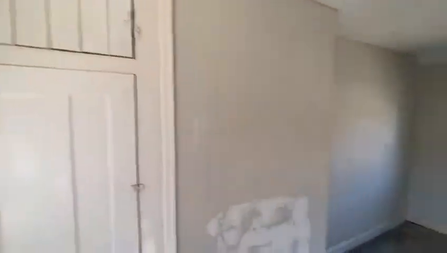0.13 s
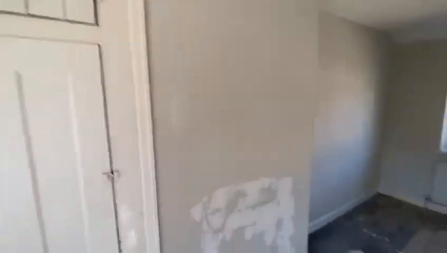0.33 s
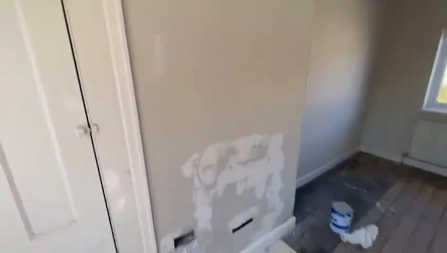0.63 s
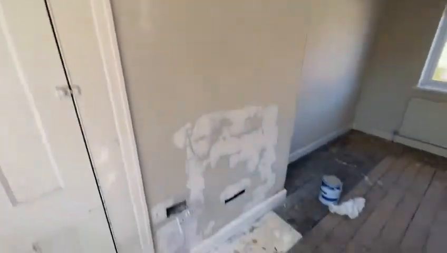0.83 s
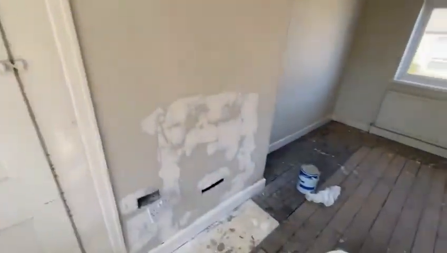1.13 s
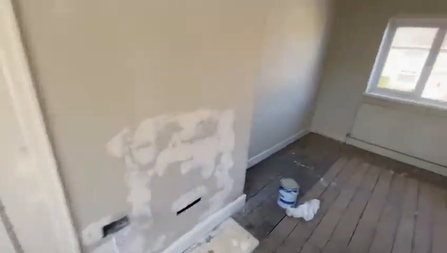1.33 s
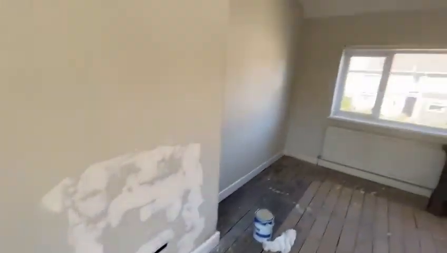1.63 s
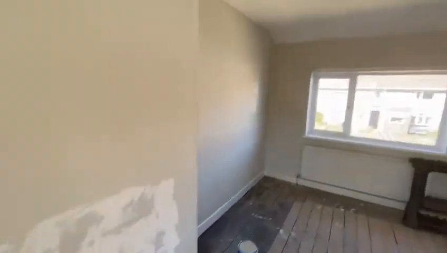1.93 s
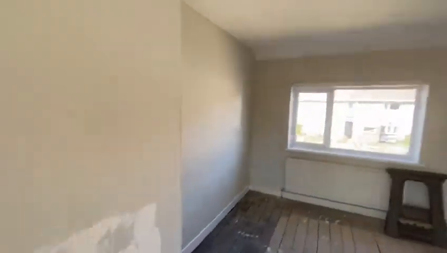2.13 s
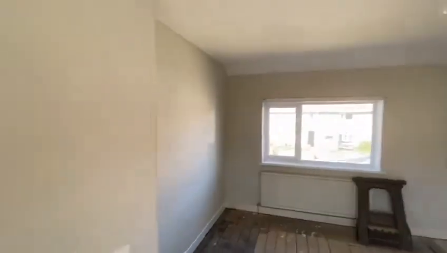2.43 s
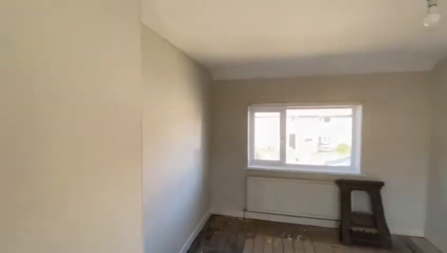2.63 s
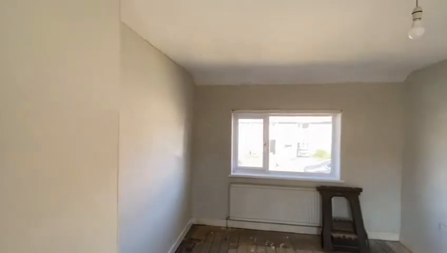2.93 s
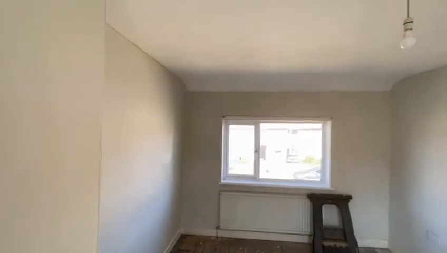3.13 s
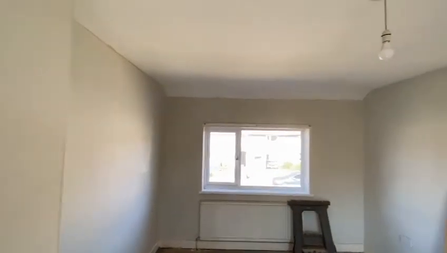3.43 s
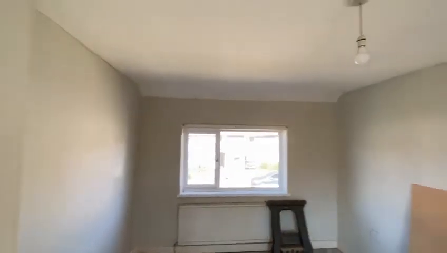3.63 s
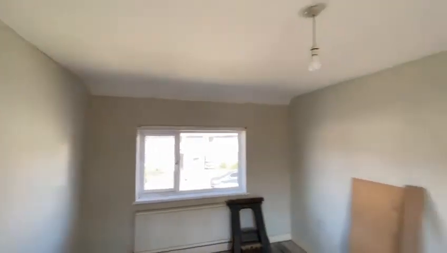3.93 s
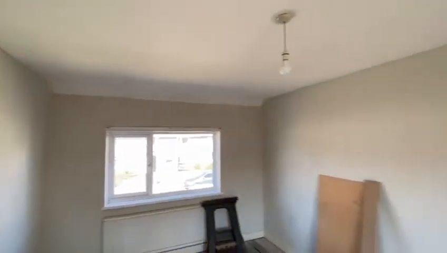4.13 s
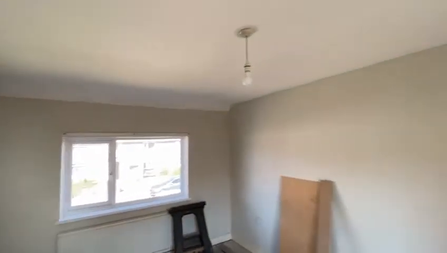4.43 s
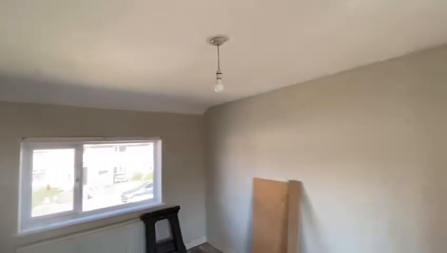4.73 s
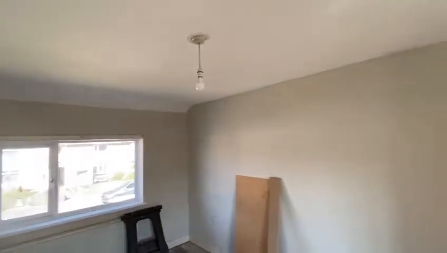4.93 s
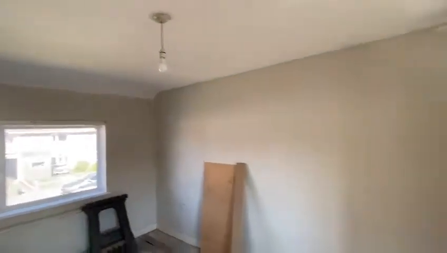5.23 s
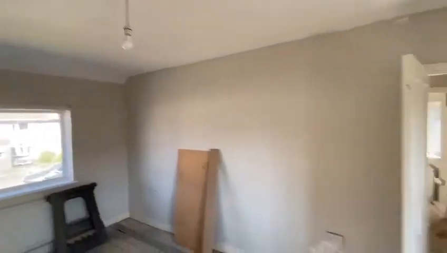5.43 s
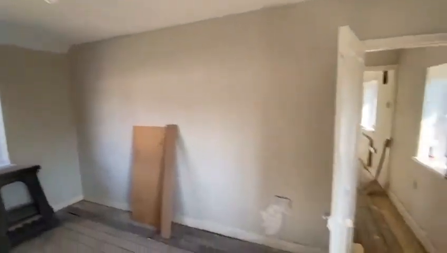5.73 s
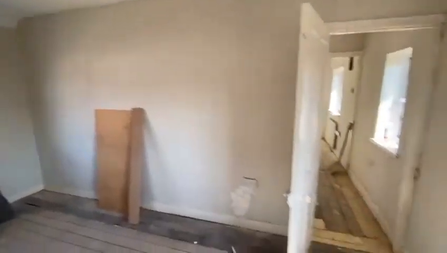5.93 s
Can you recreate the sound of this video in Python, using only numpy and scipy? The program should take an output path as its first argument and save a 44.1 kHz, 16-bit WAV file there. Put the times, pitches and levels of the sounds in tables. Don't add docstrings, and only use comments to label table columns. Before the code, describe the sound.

In a bare, reverberant room, a heavy heel thuds on wooden boards, then soles scuff and tick on grit. Quiet shuffling follows until a hollow plank is knocked just after three seconds. Quick steps crunch and a kicked wooden offcut clatters and bounces around four seconds. Then it fades to quiet air, a faint board groan, a tiny bird call and one soft last step. Small handheld stereo recorder, slightly dull and thinned treble.

```python
import sys
import numpy as np
from scipy import signal
from scipy.fft import rfft, irfft
from scipy.io import wavfile
from scipy.ndimage import uniform_filter1d

SR = 44100
rng = np.random.default_rng(int(sys.argv[2]) if len(sys.argv) > 2 else 0)


def to_linear_factor(level_db):
    exponent = np.asarray(level_db, float) / 20
    return 10 ** exponent


def transcribe(u):
    v = np.clip(np.atleast_2d(u).T, -1, 1)
    q = np.round(v * 32767).astype(np.int16)
    wavfile.write(sys.argv[1], SR, q)


N = 267951

# start_s [s], level_db [dB], treble_db [dB], left_right_db [dB]
GRIT_TICKS = [(0.003, -32, 5.5, -0.5), (0.122, -39, -31, 11), (0.184, -39, -32, -9), (0.466, -45.5, 13, 22),
              (0.636, -34.5, -5, 11), (0.659, -37, -5, -4), (0.86, -31, -11, 4), (1.596, -42, -17, -1),
              (1.795, -56, -30, 1), (2.067, -49.5, -4, 19), (2.163, -42, -10, 5), (2.515, -40, -7.5, 6),
              (2.926, -40.5, -13, 10), (3.223, -30.5, -18.5, 2.5), (3.374, -40, -16, 8),
              (3.589, -35.5, -37, 17), (3.614, -27.5, -13.5, 12), (3.644, -31, -43, -14.5),
              (3.712, -22.5, -7, 7), (3.736, -26.5, -17.5, -4), (3.862, -31.5, -2, 11.5),
              (3.964, -18.5, -12.5, -6.5), (3.994, -13.5, -5.5, 2), (4.03, -23, -40, -10),
              (4.1, -23.5, -10, 8.5), (4.323, -25.5, -2.5, 9.5), (4.624, -39.5, -31, -1),
              (5.861, -58, -19, 1), (5.909, -43.5, -14.5, 1.5), (5.947, -52, -11, 13)]
# start_s [s], level_db [dB], pitch_hz [Hz], left_right_db [dB]
CHIP_SNAPS = [(0.12, -37.5, 950, 2), (0.222, -42, 2050, 8), (0.095, -46, 674, 5), (0.15, -34.5, 440, -1),
              (0.16, -41, 660, -3), (2.164, -44, 865, 3), (2.925, -53, 1100, -8), (2.926, -53, 2400, 0),
              (2.945, -46, 705, -1), (3.223, -37, 2500, 3), (3.236, -38.5, 1550, -3), (3.77, -35, 1420, 2),
              (3.81, -46, 1330, 0), (3.714, -20.5, 7770, 3), (3.738, -25.5, 1310, 0),
              (3.966, -32, 1800, -2), (3.995, -30, 3770, 4), (3.996, -20, 5140, 10),
              (3.999, -32, 3160, -13), (4.323, -31, 1680, -1), (4.329, -23.5, 3800, -2),
              (4.328, -50, 5500, 0), (4.351, -28, 3168, 6.5)]
# start_s [s], level_db [dB], pitch_hz [Hz]
SOLE_KNOCKS = [(0.008, -31.5, 290), (0.11, -39, 332), (0.182, -39, 394), (0.243, -57, 437),
               (0.642, -42, 251), (0.667, -38.5, 236.6), (0.866, -57, 233), (1.349, -57.5, 220),
               (1.6, -55, 251), (0.801, -49, 226), (2.058, -52, 478), (2.082, -41, 327), (2.14, -49, 403),
               (2.169, -52, 397), (2.208, -55, 480), (2.945, -51.5, 307), (2.974, -44.5, 378),
               (3.668, -39, 242), (3.704, -35, 210), (3.343, -43, 376), (3.612, -38, 563), (3.64, -32, 360),
               (3.712, -30, 344.6), (3.745, -36.5, 373), (3.969, -49, 243), (3.998, -37, 300),
               (4.034, -36, 407), (4.105, -50, 366), (5.865, -60, 310), (5.885, -56, 262)]
# pitch_ratio [1], level_db [dB], t60_s [s]
BOARD_OVERTONES = [(.8, -2, 0.028), (1.004, 3.5, 0.1), (1.127, 0, 0.058), (1.22, 10, 0.016),
                   (1.6, -26, 0.062), (1.95, -6, 0.07), (2.401, -34, 0.2), (2.75, -32, 0.14)]
# start_s [s], length_s [s], friction_db [dB], fade_db [dB], board_pressure_db [dB]
SCUFFS = [(0.0, 0.13, -48.5, 3, 8), (0.628, 0.1, -34, -13, 1), (2.061, 0.31, -61, -6.5, 13.5),
          (2.924, 0.12, -57.5, -8, 15.5), (3.227, 0.17, -55, -17.5, 26), (3.582, 0.07, -41.5, 6.5, 5.5),
          (3.961, 0.13, -29, -11, 0.5), (4.093, 0.22, -39.5, -11.5, -20),
          (4.323, 0.12, -35.5, -18.5, -12.5), (4.616, 0.16, -60, -16, 8.5), (5.857, 0.12, -52, -28, 8.5)]
# start_s [s], length_s [s], friction_db [dB], board_pressure_db [dB]
SLIDES = [(0.069, 0.2, -51.5, 13), (0.4, 0.22, -49, -1), (0.684, 0.17, -39.5, -9.5), (0.799, 0.084, -44, 3),
          (1.377, 0.2, -57, 0.5), (1.543, 0.16, -54, 3.5), (1.68, 0.22, -59.5, 2.5),
          (2.301, 0.22, -53.5, -1), (2.449, 0.15, -68, 19.5), (3.059, 0.2, -53, -1), (3.6, 0.12, -38.5, 0),
          (3.69, 0.14, -39.5, 3.5), (3.799, 0.14, -40, -12), (4.181, 0.18, -50, -9),
          (4.421, 0.19, -66.5, -2), (5.171, 0.18, -66, 1), (5.348, 0.2, -61.5, -15),
          (5.415, 0.12, -69.5, 8)]
# freq_hz [Hz], density_db [dB per Hz]
GRIT_HISS = [(530, -28.5), (900, -0.5), (1370, -4.5), (1500, -4), (2010, -2.5), (2750, -3.5), (5210, -8),
             (8760, -13), (9350, -31.5), (11100, -11.5), (12000, -53.5), (15600, -29.5), (22000, -120)]
# pitch_hz [Hz], width_hz [Hz], level_db [dB]
BOARD_BODY = [(262.5, 42, 9.5), (342, 82, 6.5), (410, 180, 1), (557, 50, 2), (637, 96, -2.5),
              (720, 140, -15), (1035, 51, -29)]
# start_s [s], level_db [dB], pitch_hz [Hz], t60_s [s]
THUDS = [(0.0095, -17, 71.5, 0.15), (0.012, -35.5, 201.4, 0.17), (0.031, -33, 45.3, 0.55),
         (0.058, -36, 72, 0.25), (0.06, -35, 260, 0.13), (1.02, -53.5, 215, 0.47),
         (3.16, -50, 45, 0.35), (3.645, -34, 360, 0.064), (0.641, -47, 378, .15),
         (1.598, -62, 419, .1), (2.93, -53, 555, 0.088), (3.735, -28.5, 135, 0.15),
         (5.469, -56.5, 291, 0.25), (5.53, -61.5, 210.5, 0.32), (5.869, -56, 190, .2),
         (1.601, -50, 61.4, 0.24), (2.152, -40, 40.7, 0.27), (2.178, -42, 43.7, 0.22),
         (2.225, -44, 41.3, 0.4), (2.14, -51, 152, 0.16), (2.2, -48, 236, 0.18),
         (2.293, -55, 43.2, 0.17), (2.973, -42.5, 59.7, 0.62), (3.243, -44.5, 93, 0.27),
         (3.665, -32.5, 85.5, 0.13), (3.724, -24.5, 64.4, 0.2), (3.77, -34.5, 287.4, 0.24),
         (3.997, -34, 116, 0.31), (4.668, -58, 120, 0.14), (5.88, -55, 68.5, 0.29),
         (6.008, -71, 50.6, 0.3)]
# start_s [s], length_s [s], pitch_hz [Hz], level_db [dB]
SQUEAKS = [
    (2.45, .14, 11400, -72),
    (2.77, .07, 11400, -66),
    (3.33, .12, 11300, -71),
    (3.34, .12, 7000, -66),
]
# start_s [s], level_db [dB]
OFFCUT_BOUNCES = [
    (3.74, -49),
    (3.966, -27.5),
    (3.996, -20.5),
    (4.02, -43),
    (4.045, -49),
    (4.101, -28),
    (4.15, -42),
    (4.324, -42),
]
# pitch_hz [Hz], level_db [dB], t60_s [s]
OFFCUT_MODES = [(520, -2, 0.048), (636, -1.5, 0.047), (740, -5.5, 0.055), (1272, -5.5, 0.05),
                (1377, 4.5, 0.024), (1739, 1, 0.026), (2010, 4, 0.024), (2300, -3, 0.014)]
# start_s [s], level_db [dB], pitch_hz [Hz], left_right_db [dB]
RATTLES = [(3.965, -29.5, 644, 10), (3.995, -29, 292, 1), (3.996, -27.5, 760, -4), (4.010, -28, 471, 1),
           (4.018, -27, 638, 4), (4.031, -28.5, 336, -5), (4.012, -23, 1410, 3), (4.016, -34, 2100, 2),
           (4.038, -25.5, 1280, -2), (4.053, -28, 756, -6), (4.093, -25, 1660, -4), (4.103, -31, 362, -2),
           (4.155, -33, 806, 4), (4.175, -39, 760, 7), (4.213, -40, 557, 0), (4.236, -42, 520, -6),
           (4.279, -43, 517, 4), (4.622, -44, 1230, -3), (4.624, -54, 746, 3), (4.634, -54, 360.5, 0),
           (0.853, -40, 955, -2), (0.862, -42, 560, 3), (0.77, -35, 1580, 0), (1.594, -55, 1200, 2),
           (1.616, -51, 840, 0), (1.475, -62, 2100, 0), (1.8, -55, 600, 0), (1.638, -49, 700, 0),
           (1.655, -48.5, 830, -2), (2.064, -44, 560, 5), (2.172, -42, 410, -4), (2.205, -42.5, 445, -3),
           (2.928, -54, 1300, 0), (2.93, -46, 1890, -3), (2.947, -47, 520, 2), (2.956, -42, 407, 2),
           (2.964, -41, 1790, -4), (3.265, -29, 844, 6), (3.29, -29.5, 805, 4), (3.318, -36, 827, 2),
           (3.336, -37, 845, 3), (3.377, -34.5, 363, -4), (3.226, -41, 1550, 4), (3.278, -43, 1620, 0),
           (3.295, -35, 1700, -3), (3.968, -26, 1860, 0), (3.735, -38, 1340, 4), (0.64, -46, 4100, 0),
           (0.7, -48, 5200, 0), (0.79, -39, 3560, 0)]
# pitch_hz [Hz], level_db [dB], t60_s [s]
PLANK_MODES = [(135, -15.5, 0.104), (327, -0.5, 0.18), (374, -3.5, 0.15), (397, -9, 0.33),
               (529, -10.5, 0.096), (667, -28, 0.078), (756, -21.5, 0.48), (800, -21, 0.77),
               (818, -17.5, 0.48), (928, -20, 0.6), (1600, -16, 0.23)]
# start_s [s], level_db [dB]
PLANK_BLOW = (3.2305, -15.5)
# pitch_hz [Hz], level_db [dB], t60_s [s]
JOIST_MODES = [(38.8, -8.5, 0.94), (58.6, 4.5, 0.31), (73, -5, 0.03), (101, -5, 0.21), (138.5, -19, 0.55)]
# start_s [s], level_db [dB], letting_go_t60_s [s]
LOADS = [(0.028, -24.5, 0.59), (0.48, -47, 1.7), (0.74, -54, 0.47), (0.859, -50.5, 1.3), (1.39, -60, .3),
         (1.63, -51, 0.23), (1.83, -66, 0.47), (2.15, -41.5, 0.9), (2.4, -52, 1.3), (2.55, -52, 0.1),
         (2.66, -52.5, 0.82), (2.989, -37, 0.24), (3.11, -50, 2.2), (3.38, -50, 0.17), (3.63, -35.5, 1.14),
         (3.76, -30, 0.34), (3.858, -56, 0.19), (4.05, -42.5, 0.65), (4.18, -44, 0.13), (4.47, -48, 0.15),
         (4.77, -60.5, 2.7), (5.03, -65, 2.2), (5.3, -64, 0.15), (5.52, -47.5, 0.4), (5.9, -48, 0.65),
         (6.04, -58, 0.17)]
# time_s [s], pitch_hz [Hz], level_db [dB]
GROAN = [
    (5.46, 89, -73),
    (5.51, 96.2, -60),
    (5.55, 100.5, -53),
    (5.6, 98.5, -54),
    (5.63, 101, -87),
]
# time_s [s], pitch_hz [Hz], level_db [dB]
BIRD = [
    (5.47, 6980, -86),
    (5.502, 7550, -79),
    (5.61, 7100, -81),
    (5.652, 7820, -83),
    (5.706, 7660, -85),
    (5.744, 7100, -99),
    (5.772, 7260, -85),
    (5.808, 8000, -79),
    (5.86, 7200, -83),
]
# start_s [s], length_s [s], pitch_hz [Hz], level_db [dB]
OUTDOOR_WHINES = [
    (0.849, 0.67, 2050, -65.5),
    (4.699, 0.6, 2044, -76),
    (4.877, 0.15, 1150, -68),
    (5.02, .14, 1160, -75),
    (5.142, 0.095, 1140, -70),
]
# freq_hz [Hz], t60_s [s]
ROOM_DECAY = [(60, 0.74), (130, 0.46), (230, 0.62), (420, 0.98), (1100, 1), (2900, 1), (7700, 0.69)]
# freq_hz [Hz], density_db [dB per Hz]
AIR_SPECTRUM = [(18, -52), (30, -3.5), (108, -4), (132, -5.5), (317, -13), (461, -10), (1050, -9.5),
                (1140, -8), (1260, -11), (2350, -13.5), (3180, -17.5), (7640, -20.5), (12000, -28),
                (15600, -83), (22000, -120)]
# time_s [s], level_db [dB]
AIR_DRIFT = [(0.0, -58), (1.1, -61.5), (3.5, -58.5), (4.3, -59), (4.8, -72.5), (5.8, -70.5), (6.07, -64)]
# freq_hz [Hz], likeness [0-1]
LIKENESS = [(45, .995), (80, .97), (140, .6), (300, .62), (600, .15), (4000, .1), (8500, .45), (11000, .6)]
# freq_hz [Hz], gain_db [dB]
MIC = [(18, -52.5), (30, -5), (45, -3.5), (2300, -2), (2500, -3.5), (2750, -3.5), (7500, -4), (8800, -3),
       (9350, -4.5), (9800, -5.5), (11650, -8.5), (11950, -57)]
# freq_hz [Hz], threshold [spreads]
HOLES = [(700, -30), (900, -3.2), (1700, -2.4), (2200, -2), (2500, -1.5), (3000, -1.6), (7300, -1.45),
         (7900, -.6), (8900, -.3), (9300, -.35), (9700, -.5), (9900, -1.4), (11500, -1.3)]
# freq_hz [Hz], threshold_db [dB]
GIVING_UP = [(1000, -40), (1500, -10), (7000, -10), (7800, -7), (8600, -4.5), (9100, 1.5), (9600, 2),
             (9700, -8), (11300, -10), (11750, -2)]
# freq_hz [Hz], share [1]
THINNING = [(7000, 0.67), (7800, 0.91), (9400, 0.91), (9800, .6)]
# freq_hz [Hz], side_gain_db [dB]
SIDE = [(40, -10), (70, -7.5), (120, 2), (250, 1), (6000, 0), (8500, 3), (9800, -3), (11500, -16)]

BITE_S, SWELL_DB = 0.011, -13
SOLE_HZ, SOLE_HZ_PER_DB = 1590, -19
LOADING_DB_PER_S, REST_DB = 240, -71.5
SNAP_CYCLES, SNAP_RISE_S = 18.8, 0.00016
RATTLE_CYCLES, RATTLE_RISE_S = 25.6, 0.0014


def read(points, hz):
    f, value = np.transpose(points)
    return np.interp(np.log(hz + 1), np.log(f + 1), value)


def evened(x):
    return x / np.sqrt(np.mean(x ** 2) + 1e-20)


def add(mix, start_s, sound):
    part = mix[:, max(round(start_s * SR), 0):][:, :sound.shape[1]]
    part += sound[:, :part.shape[1]]


def panned(x, left_right_db):
    return x * to_linear_factor(np.array([left_right_db / 2, -left_right_db / 2])).reshape(2, -1)


def coloured(x, points):
    hz = abs(np.fft.fftfreq(4096, 1 / SR))
    log_gain = np.log(to_linear_factor(read(points, hz)))
    phase = -signal.hilbert(log_gain).imag
    taps = np.fft.ifft(np.exp(log_gain + 1j * phase)).real[:2048]
    taps = taps.reshape((1,) * (x.ndim - 1) + (-1,))
    return signal.oaconvolve(x, taps, axes=-1)[..., :x.shape[-1]]


def resonate(x, hz, width_hz):
    turn = np.exp(2j * np.pi * np.cumsum(hz * np.ones(x.shape[-1])) / SR)
    r = np.exp(-np.pi * width_hz / SR)
    return 2 * (turn * signal.lfilter([1 - r], [1, -r], x / turn)).real


def noise_pair(size):
    a, b = rfft(rng.standard_normal((2, size)))
    hz = np.fft.rfftfreq(size, 1 / SR)
    same = np.clip(read(LIKENESS, hz), 0, 1)
    return hz, np.array([a, same * a + np.sqrt(1 - same ** 2) * b])


def ring(modes, rise_s, phases):
    t = np.arange(SR // 2) / SR
    x = 0
    for (hz, db, t60), phase in zip(modes, phases):
        x = x + to_linear_factor(db - 60 * t / t60) * np.sin(2 * np.pi * (hz * t + phase))
    x = x * (1 - np.exp(-t / rise_s))
    return x / abs(x).max()


def grit_ticks():
    out, t = np.zeros((2, N)), np.arange(2048) / SR
    cracks = rng.standard_normal((len(GRIT_TICKS), 2, 2048))
    for (start_s, db, treble_db, pan_db), crack in zip(GRIT_TICKS, cracks):
        tilt = [(400, -35.0), (800, 5.5), (2200, -5.0), (5500, treble_db + 4.0), (11000, treble_db - 5.0)]
        blended = crack + .4 * crack[::-1]
        burst = blended * np.exp(-t / .006) * (1 - np.exp(-t / .004))
        tick = coloured(burst, tilt)
        add(out, start_s, panned(to_linear_factor(db - 4.5) * tick / abs(tick).max(), pan_db))
    return out


def sole_knocks():
    out = np.zeros((2, N))
    chance = rng.random((len(SOLE_KNOCKS), 2, len(BOARD_OVERTONES)))
    for (start_s, db, hz), (left, right) in zip(SOLE_KNOCKS, chance):
        modes = [(hz * ratio, mode_db, t60) for ratio, mode_db, t60 in BOARD_OVERTONES]
        board = np.array([ring(modes, .009, .1 * left), ring(modes, .009, .28 * right)])
        add(out, start_s, to_linear_factor(db + 3) * board)
    return out


def chips(rows, cycles, rise_s):
    out, t = np.zeros((2, N)), np.arange(4096) / SR
    for start_s, db, hz, pan_db in rows:
        fall = to_linear_factor(db - 60 * t * hz / cycles)
        chip = fall * (1 - np.exp(-t / rise_s)) * np.sin(2 * np.pi * hz * t)
        add(out, start_s, panned(chip, pan_db))
    return out


def drag(rub_db, body_db):
    size = len(rub_db)
    draw = rng.random((size, 2, 3)).T
    stick_slip = evened(uniform_filter1d(rng.standard_normal(size), size=500))
    clumps = to_linear_factor(4 * np.tanh(stick_slip))
    happens = draw[0] < 4000 / SR
    strength = to_linear_factor(-3.0 * np.log(draw[2] + 0.0023))
    slips = happens * np.sign(draw[1] - .5) * strength * clumps

    body = sum(to_linear_factor(db) * resonate(slips.sum(0), hz, width) for hz, width, db in BOARD_BODY)
    body = body - uniform_filter1d(body, size=300)
    sole_hz = SOLE_HZ + SOLE_HZ_PER_DB * body_db
    sole = resonate(resonate(slips, sole_hz, 311), sole_hz, 360)
    hiss = evened(coloured(slips, GRIT_HISS))
    dull = uniform_filter1d(hiss, size=9)
    hiss = dull + (hiss - dull) * to_linear_factor(-.4 * np.maximum(body_db, 0))
    sound = hiss + to_linear_factor(-27.0) * evened(sole) + to_linear_factor(body_db - 3.5) * evened(body)
    return to_linear_factor(rub_db - 8) * sound * signal.windows.tukey(size, .06)


def scuff(start_s, length_s, db, fade_db, body_db):
    t = np.arange(0, length_s, 1 / SR)
    return start_s, np.minimum(t / BITE_S, 1) * drag(db + fade_db * t / length_s, body_db)


def slide(start_s, length_s, db, body_db):
    stroke = np.linspace(-1, 1, round(length_s * SR))
    return start_s, drag(db + SWELL_DB * stroke ** 2, body_db)


def thuds():
    out = np.zeros((2, N))
    for start_s, db, hz, t60 in THUDS:
        modes = [(hz, 0, t60), (1.3 * hz, -6, t60), (1.9 * hz, -13, t60)]
        add(out, start_s, panned(to_linear_factor(db - 0.5) * ring(modes, 0.0048, (0, 0, 0)), 0))
    return out


def whistle(start_s, length_s, hz, db):
    noise = rng.standard_normal((2, round(length_s * SR)))
    fuzzy = resonate(resonate(noise, hz, 210), hz, 230)
    return start_s, to_linear_factor(db) * evened(fuzzy) * np.hanning(fuzzy.shape[1])


def offcut_clatter():
    out, chance = np.zeros((2, N)), rng.random((len(OFFCUT_BOUNCES), 3, len(OFFCUT_MODES)))
    for (start_s, db), (left, right, spread) in zip(OFFCUT_BOUNCES, chance):
        modes = [(hz, mode_db - 6.4 * u, t60) for (hz, mode_db, t60), u in zip(OFFCUT_MODES, spread)]
        bounce = np.array([ring(modes, 0.0017, left), ring(modes, 0.0012, right)])
        add(out, start_s, to_linear_factor(db) * bounce)
    return out


def plank():
    out, (start_s, db) = np.zeros((2, N)), PLANK_BLOW
    turns = np.arange(len(PLANK_MODES)) / 2
    blow = np.array([ring(PLANK_MODES, 0.0026, turns), ring(PLANK_MODES, 0.0021, turns * 1.09)])
    add(out, start_s, to_linear_factor(db) * blow)
    return out


def joists():
    push = irfft(noise_pair(N)[1], N)
    boom = sum(to_linear_factor(db) * evened(resonate(push, hz, 9.2 / t60 + 12)) for hz, db, t60 in JOIST_MODES)
    t = np.arange(0, N, 64) / SR
    load = to_linear_factor(REST_DB)
    for start_s, db, t60 in LOADS:
        since = t - start_s
        load = load + to_linear_factor(db + np.minimum(LOADING_DB_PER_S * since, -60 * since / t60))
    return to_linear_factor(-6.5) * np.interp(np.arange(N) / SR, t, load) * evened(boom)


def gliding_tone(rows, octave_db):
    time_s, hz, db = np.transpose(rows)
    t = np.arange(time_s[0], time_s[-1], 1 / SR)
    glide = uniform_filter1d(np.interp(t, time_s, hz), size=300)
    turn = 2 * np.pi * np.cumsum(glide) / SR
    wave = np.sqrt(2) * (np.sin(turn) + to_linear_factor(octave_db) * np.sin(2 * turn))
    level = to_linear_factor(np.interp(t, time_s, db))
    return time_s[0], panned(level * wave * signal.windows.tukey(len(t), .06), 0)


def room(x):
    t, bands = np.arange(SR) / SR, np.log([hz for hz, _ in ROOM_DECAY])
    out, turn = np.zeros((2, N)), np.pi * 2.3 * np.arange(N) / SR
    for k in range(3):
        hz, z = noise_pair(SR)
        tail = 0
        for row, (_, t60) in zip(np.eye(len(ROOM_DECAY)), ROOM_DECAY):
            mask = np.interp(np.log(hz + 1), bands, row)
            tail = tail + irfft(z * mask, SR) * to_linear_factor(-60 * t / t60)
        tail = tail * (1 - np.exp(-(t / 0.0023) ** 2))
        tail[rng.integers(0, 2, 8), rng.integers(100, 1200, 8)] += 13.7 * rng.choice([-1, 1], 8)
        share = np.sqrt(2 / 3) * np.cos(turn + k * np.pi / 3)
        out += signal.fftconvolve(x * share, tail / np.linalg.norm(tail[0]), axes=1)[:, :N]
    return out


def air():
    hz, z = noise_pair(N)
    flicker = evened(uniform_filter1d(rng.standard_normal(N), size=3000))
    level_db = np.interp(np.arange(N) / SR, *np.transpose(AIR_DRIFT)) + 1.8 * flicker
    return to_linear_factor(level_db) * evened(irfft(z * to_linear_factor(read(AIR_SPECTRUM, hz)), N))


def starved(x):
    mid_side = np.array([x[0] + x[1], x[0] - x[1]]) / 2
    hz, _, z = signal.stft(mid_side, SR, nperseg=2048, noverlap=1536)
    level = uniform_filter1d(np.log(abs(z) + 1e-9), size=4, axis=2)

    valley = uniform_filter1d(level, size=11, axis=1) - uniform_filter1d(level, size=61, axis=1)
    valley = valley / valley[:, (hz > 2000) & (hz < 7000)].std()
    kept = np.where(valley < read(HOLES, hz)[:, None], to_linear_factor(-35), 1)

    middle = level[:, (hz > 1000) & (hz < 5000)].mean(1, keepdims=True)
    share = uniform_filter1d(level, size=25, axis=1) - middle
    patches = rng.standard_normal((2, 86, z.shape[2] // 3 + 1)).repeat(12, axis=1).repeat(3, axis=2)
    share = share - np.median(share, axis=2, keepdims=True) + .4 * patches[:, :len(hz), :z.shape[2]]
    kept[share < np.log(to_linear_factor(read(GIVING_UP, hz)))[:, None]] = to_linear_factor(-35)

    neighbours = uniform_filter1d(abs(z), size=25, axis=1)
    weak = (abs(z) < read(THINNING, hz)[:, None] * neighbours) & (hz[:, None] > 900)
    kept = kept * np.where(weak, to_linear_factor(-47), 1)
    kept[1] *= to_linear_factor(read(SIDE, hz))[:, None]
    mid, side = signal.istft(z * kept, SR, nperseg=2048, noverlap=1536)[1][:, :N]
    return np.array([mid + side, mid - side])


def scene():
    ticks, knocks = grit_ticks(), sole_knocks()
    ticks = ticks + chips(CHIP_SNAPS, SNAP_CYCLES, SNAP_RISE_S)
    knocks = knocks + to_linear_factor(-4.0) * plank()
    upper = offcut_clatter()
    lower = thuds() + to_linear_factor(2.5) * chips(RATTLES, RATTLE_CYCLES, RATTLE_RISE_S)
    for row in SCUFFS:
        add(upper, *scuff(*row))
    for row in SLIDES:
        add(upper, *slide(*row))
    add(lower, *gliding_tone(GROAN, octave_db=-42))
    add(lower, *gliding_tone(BIRD, octave_db=-60))
    for row in SQUEAKS + OUTDOOR_WHINES:
        add(lower, *whistle(*row))
    wet = room(to_linear_factor(6.0) * upper + to_linear_factor(5.0) * ticks + to_linear_factor(-6.0) * knocks + to_linear_factor(-2.5) * lower)
    direct = to_linear_factor(-5.5) * plank() + upper + ticks + knocks + lower
    return direct + wet + joists() + air()


def top_cut(x):
    return signal.sosfilt(signal.butter(12, 12260, fs=SR, output="sos"), x)


def record(dry):
    mix = starved(coloured(dry, MIC))
    return top_cut(mix)


dry = scene()
out = record(dry)
transcribe(out)
```